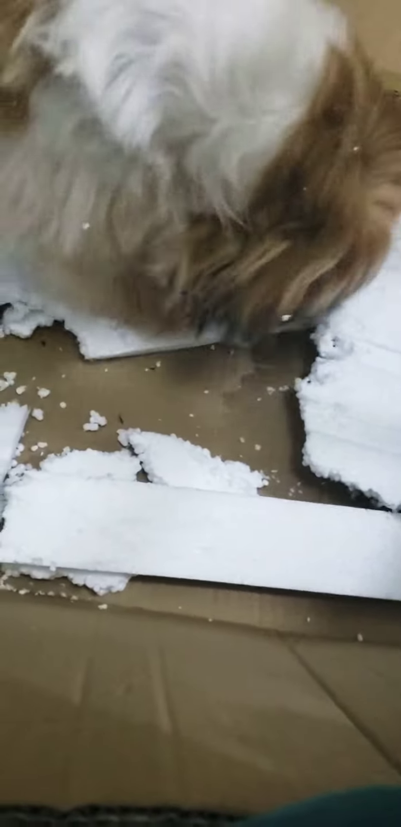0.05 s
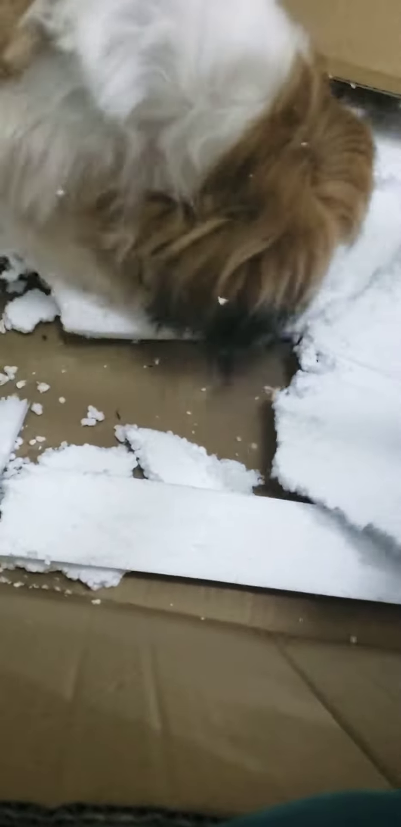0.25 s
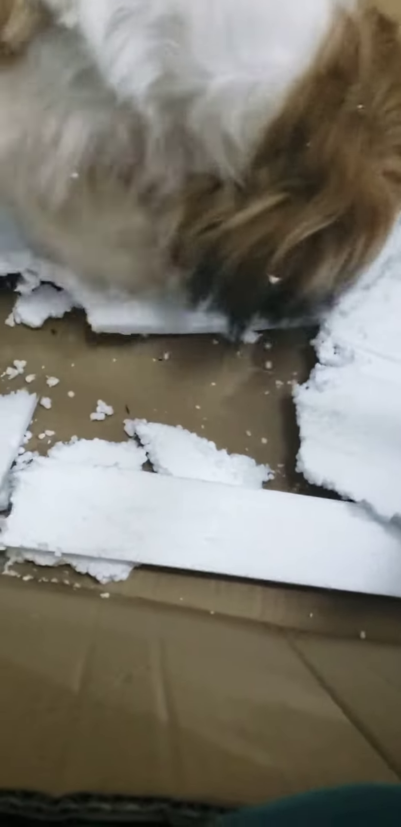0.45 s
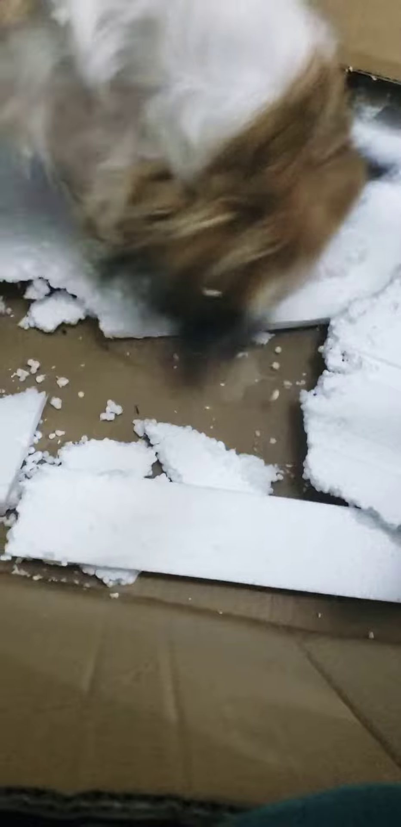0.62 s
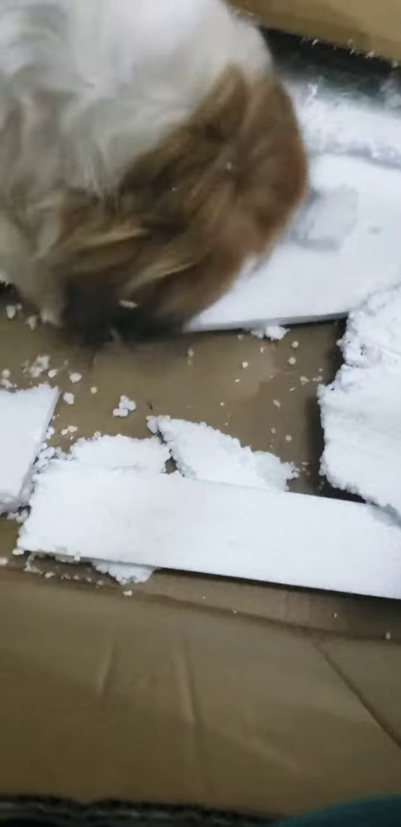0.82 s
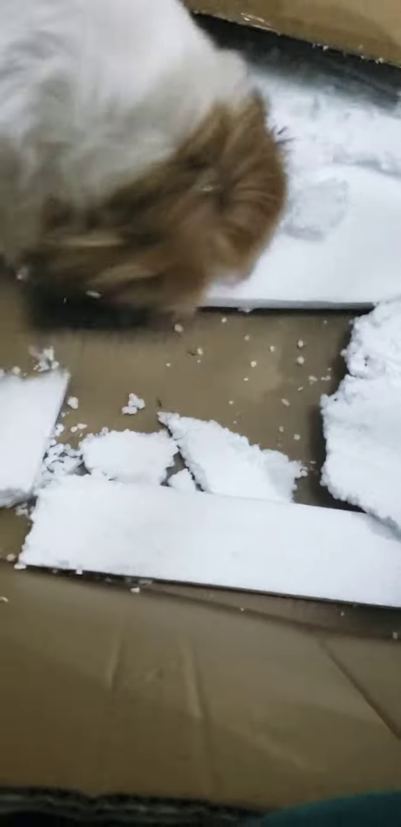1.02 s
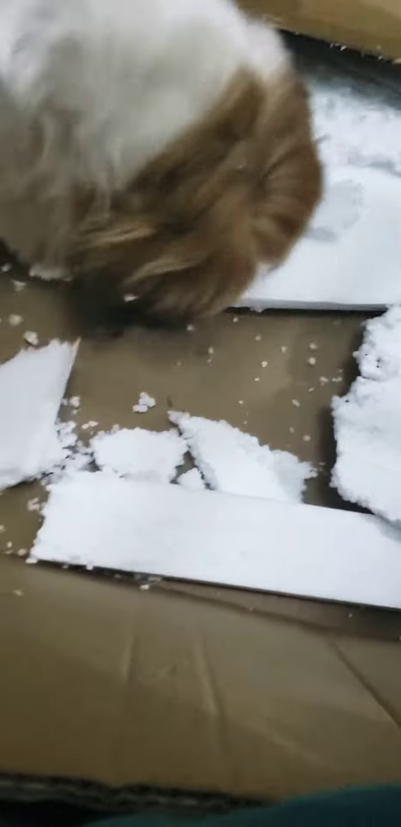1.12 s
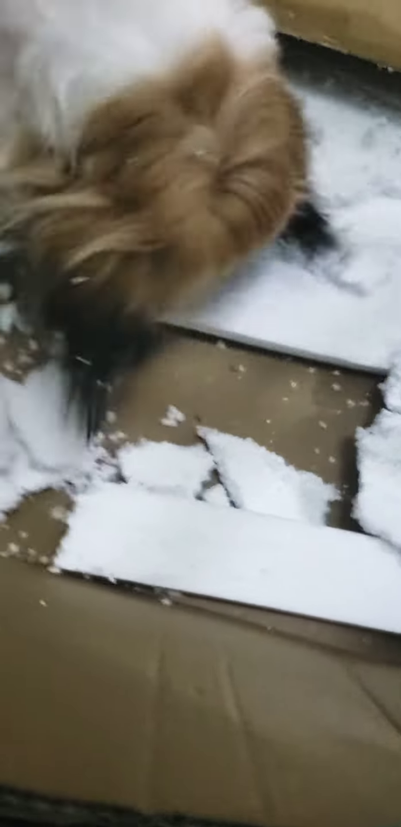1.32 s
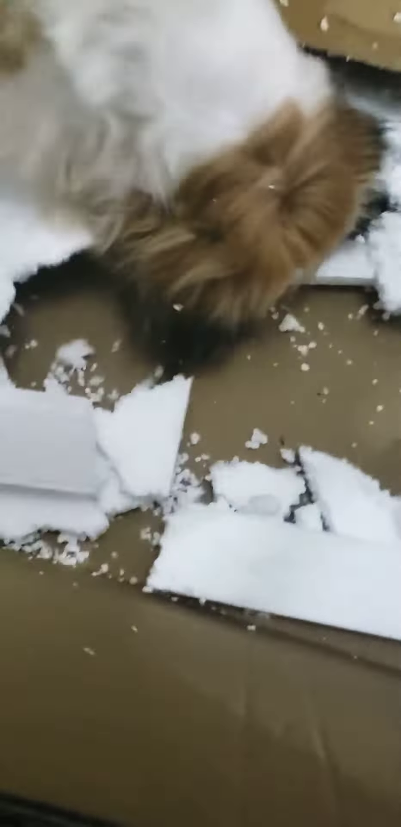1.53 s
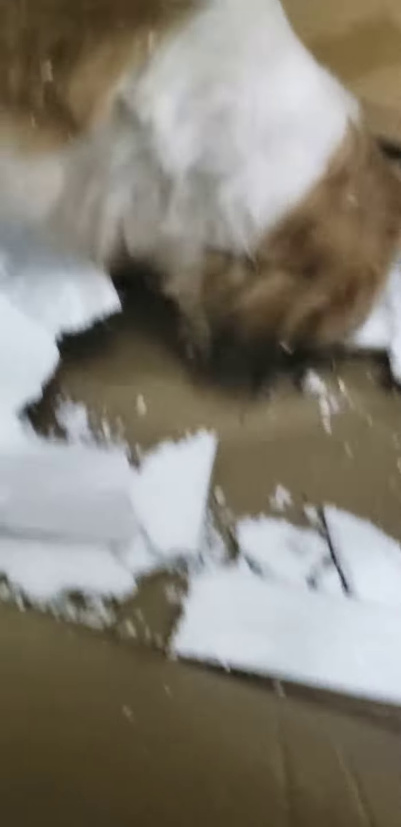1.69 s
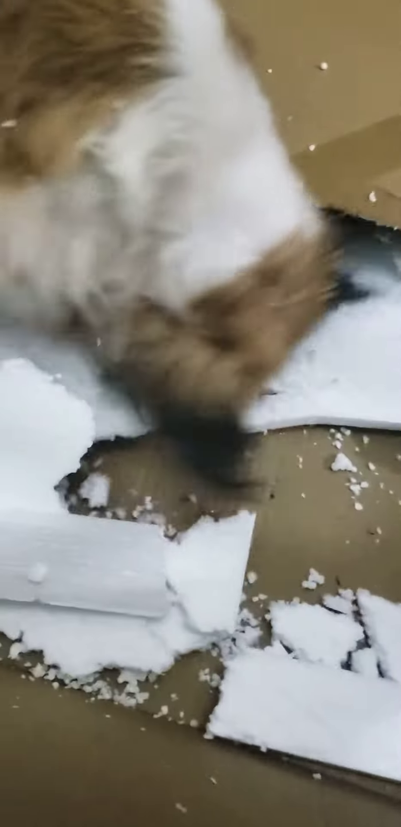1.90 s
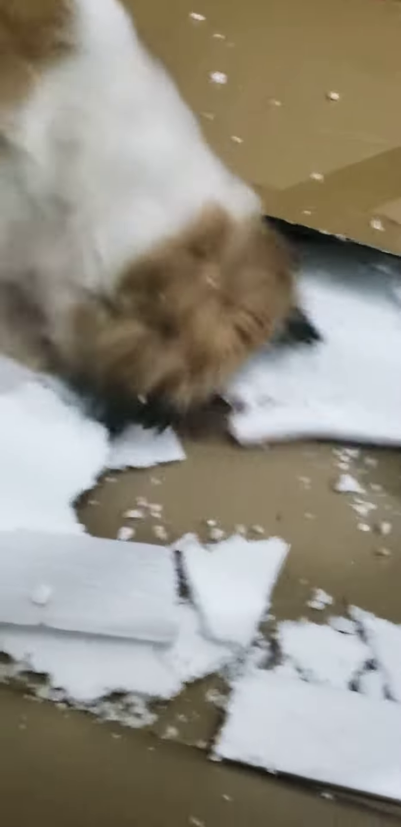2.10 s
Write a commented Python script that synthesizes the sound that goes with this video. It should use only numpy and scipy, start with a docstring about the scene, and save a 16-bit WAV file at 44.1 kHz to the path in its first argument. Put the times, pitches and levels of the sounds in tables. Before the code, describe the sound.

Brittle foam crackles and snaps close to the microphone as a puppy bites it in a cardboard box. A crunchy burst comes at about 0.2 to 0.4 seconds and another near 0.6. After a short lull, scraping and tearing resume from 0.9 to 1.9 seconds in rough, uneven bursts, strongest around 1.2 and 1.5, with dull bumps from the box. Soft room noise and a faint hum lie underneath.

```python
"""Foam rubs softly on cardboard over room air and a faint hum: a puppy is at a sheet of brittle packing
foam in a box, close to a phone in a small room. As it bites, single beads snap and the foam pings.
Each tear is a run of tiny fractures that crackle and shake the sheet. Now and then the box floor
flexes under the puppy with a dull bump."""
import sys
import numpy as np
from scipy import signal
from scipy.fft import rfft, irfft
from scipy.io import wavfile

SR = 44100
rng = np.random.default_rng(int(sys.argv[2]) if len(sys.argv) > 2 else 0)


def to_wav(s):
    """Save 16-bit WAV."""
    ch = np.atleast_2d(s).T  # columns
    pcm = np.round(np.clip(ch, -1, 1) * 32767)  # PCM
    wavfile.write(sys.argv[1], SR, pcm.astype(np.int16))


N = 94815
TIME_S = np.arange(N) / SR


def amp(db):
    """Decibels to gain."""
    return 10 ** (np.asarray(db) / 20)


def unit(x):
    """Scale to rms 1."""
    return x / np.sqrt(np.mean(x ** 2))


def convolve(x, response):
    """Pass a sound through an impulse response."""
    return irfft(rfft(x, 2 * N) * rfft(response, 2 * N))[..., :N]


def colour(x, points, size=4096):
    """Minimum-phase filter of unit energy through (frequency [Hz], gain [dB]) points."""
    hz, db = np.array(points).T
    bins_hz = np.maximum(np.fft.rfftfreq(size, 1 / SR), 1)
    gain = amp(np.interp(np.log(bins_hz), np.log(hz), db))
    cepstrum = irfft(np.log(gain))
    cepstrum[1:size // 2] *= 2
    cepstrum[size // 2 + 1:] = 0
    response = irfft(np.exp(rfft(cepstrum)))
    return convolve(x, response / np.linalg.norm(response))


def pan(db):
    """Stereo gains, left louder by db."""
    return unit(amp(np.array([[db], [-db]]) / 2))


def port_noise(own_gain):
    """Noise at the phone's two ports: one shared part plus each port's own."""
    return rng.standard_normal(N) + own_gain * rng.standard_normal((2, N))


def slips(rate_per_s, spread_db, count=8000):
    """Irregular impulses of uneven size, rms 1."""
    at = (np.cumsum(rng.exponential(1, count)) * SR / rate_per_s).astype(int)
    size = amp(spread_db * np.clip(rng.standard_normal(count), -2, 2)) * rng.choice([-1, 1], count)
    return unit(np.bincount(at[at < N], size[at < N], N))


def burst(impulses, decay_s, scattered, scatter_s=0.0085):
    """Each impulse sets off a puff of breaking cells; the box scatters a share of its energy."""
    short, long = (np.exp(-2 * TIME_S / s) for s in (decay_s, scatter_s))
    energy_decay = (1 - scattered) * short / short.sum() + scattered * long / long.sum()
    envelope = np.sqrt(np.abs(convolve(impulses ** 2, energy_decay)))
    return envelope * unit(port_noise(amp(1.5)))


def place(x, pan_db, room_db, room_channels=2, t60_s=0.33, port_lag_s=0.00015):
    """Sound reaches the left port first, then returns as dense room reflections."""
    left, right = x * np.ones((2, 1))
    direct = np.array([left, np.roll(right, int(port_lag_s * SR))])
    build_up = 1 - np.exp(-TIME_S / (t60_s / 50))
    tail = rng.standard_normal((room_channels, N)) * amp(-60 * TIME_S / t60_s) * build_up
    tail /= np.linalg.norm(tail, axis=1, keepdims=True)
    return direct * pan(pan_db) + amp(room_db) * convolve(x, tail) * pan(pan_db / 2)


# Rub envelope (time [s], level [dB])
RUB_LEVELS = [(0, -44), (.11, -44), (.16, -41.5), (0.229, -32.5), (.37, -43), (.46, -53), (.83, -50),
              (0.892, -30), (1.02, -37), (1.085, -36), (1.125, -43.5), (1.208, -21.5), (1.3, -49),
              (1.371, -33.5), (1.45, -21.5), (1.505, -36.5), (1.6, -28.5), (1.7, -42), (1.81, -27.5),
              (1.91, -39), (2.15, -39.5)]


def rubbing(rasp_db=-9, knock_db=-12):
    """Foam sticks and slips on cardboard; returns crackle, rasp and knock drives."""
    at_s, db = np.array(RUB_LEVELS).T
    grains = amp(np.interp(TIME_S, at_s, db)) * slips(rate_per_s=1800, spread_db=-2.5)
    puffs = burst(grains, decay_s=0.00073, scattered=0.45)
    return puffs, amp(rasp_db) * grains, amp(knock_db) * grains


# Crackle spectrum (frequency [Hz], gain [dB])
CRACKLE_SPECTRUM = [(500, -24), (1500, -3), (2600, -3.5), (3700, 1.5), (6000, 0), (7700, 1.5), (8900, -2.5),
                    (12000, 4), (15500, 1)]


def crackling(puffs):
    """Breaking cells: the foam's bright top."""
    return colour(puffs, CRACKLE_SPECTRUM)


# Rasp spectrum (frequency [Hz], gain [dB])
RASP_SPECTRUM = [(250, -23), (600, -3.5), (1000, -0.5), (1500, -5), (2200, -8), (3500, -11), (8000, -29)]


def rasping(pushes):
    """The shaken sheet rasps in the midrange."""
    return colour(burst(pushes, decay_s=0.002, scattered=0.25), RASP_SPECTRUM)


# Knock spectrum (frequency [Hz], gain [dB])
KNOCK_SPECTRUM = [(40, -41.5), (100, -14.5), (200, -1), (320, 1.5), (450, 2.5), (620, -15.5), (1200, -18.5),
                  (4000, -81)]
# Modes of the sheet on the box (frequency [Hz], relative level [dB], T60 [s])
SHEET_MODES = [(128, -16, 0.21), (153.4, -15.5, 0.17), (217, -16.5, 0.13), (308.2, -7, 0.28),
               (390.4, -6, 0.13), (434, -9, 0.11), (490, -8, 0.079)]


def knocking(pushes):
    """The pushed sheet gives a dull knock and rings hollow at its modes."""
    ring = sum(amp(db) * unit(np.cos(2 * np.pi * hz * TIME_S) * amp(-60 * TIME_S / t60_s))
               for hz, db, t60_s in SHEET_MODES)
    return (colour(pushes, KNOCK_SPECTRUM) + convolve(pushes, ring / np.sqrt(N))) / 2


# Hum partials (frequency [Hz], nominal starting level [dB])
HUM_PARTIALS = [(153.5, -54), (227, -58), (308, -57), (386, -61.5)]


def humming(waver_db=6, waver_rad=0.5, fade_db_per_s=5.5, knots=24):
    """A faint hum, perhaps an appliance, wavers and fades."""
    def waver():
        return np.interp(TIME_S, np.linspace(0, TIME_S[-1], knots), rng.standard_normal(knots))

    hum = np.zeros(N)
    for hz, db in HUM_PARTIALS:
        rms = amp(db + waver_db * waver() - fade_db_per_s * TIME_S)
        hum += np.sqrt(2) * rms * np.sin(2 * np.pi * hz * TIME_S + waver_rad * waver())
    return hum


# Air spectrum (frequency [Hz], gain [dB])
AIR_SPECTRUM = [(25, -18), (70, -3), (150, -3), (400, 2.5), (800, -9.5), (2000, -11.5), (6000, -19.5),
                (16000, -32)]


def room_air(level_db=-51.5):
    """Soft, steady room noise."""
    return amp(level_db) * unit(colour(port_noise(0.53), AIR_SPECTRUM))


# Bead snaps (time [s], crackle drive [dB], rasp drive [dB], knock drive [dB])
BEAD_SNAPS = [(.0437, -24, -62, -40), (0.129, -32, -44, -39), (0.2445, -13, -22, -34),
              (0.2576, -15.5, -19, -25), (0.2679, -12, -21, -33), (0.2746, -14, -14, -19.5),
              (.3100, -9, -36, -13.5), (0.3326, -15.5, -18, -21), (.3360, -30, -36, -13.5),
              (0.3496, -14, -39, -24), (0.361, -19, -17, -18.5), (0.5426, -26, -31.5, -25),
              (0.5494, -24, -17.5, -21.5), (0.566, -28, -25.5, -34), (.5765, -20, -17.5, -29),
              (0.5993, -13.5, -22.5, -43), (.6012, -25, -23, -13.5), (0.843, -39, -40, -34.5),
              (0.8764, -25.5, -27, -42), (.909, -39, -23.5, -26.5), (0.994, -31, -25.5, -45),
              (1.0131, -24, -51, -33), (1.1955, -30, -14.5, -17.5), (1.2172, -29, -22, -9.5),
              (1.2271, -29, -26, -20.5), (1.264, -44, -41, -28), (1.3310, -26.5, -37, -46),
              (1.4515, -13.5, -29, -38), (1.4668, -23, -33, -14), (1.5303, -13, -32, -48),
              (1.5715, -34, -18.5, -29), (1.5958, -21, -45, -28), (1.6146, -20, -22.5, -35),
              (1.7117, -32, -32.5, -38), (1.7378, -19.5, -38, -43), (1.778, -42, -27.5, -27),
              (1.801, -34, -43, -20)]


def snapping(reference_s=0.0017):
    """Single beads crack and jolt the sheet; returns crackle, rasp and knock drives."""
    kicks = np.zeros((3, N))
    for at_s, *levels_db in BEAD_SNAPS:
        # One sample holds the energy of reference_s at that level.
        kicks[:, int(at_s * SR)] += amp(levels_db) * np.sqrt(reference_s * SR)
    crackle, rasp, knock = kicks
    return burst(crackle, decay_s=0.0012, scattered=0.17), rasp, knock


# Pings and squeaks (time [s], frequency [Hz], level [dB], decay [s])
FOAM_PINGS = [(.0438, 7400, -18.5, 0.00072), (.9085, 1090, -30, .005), (.9915, 1060, -26.5, 0.003),
              (1.5301, 4120, -16, 0.00082), (1.5815, 1040, -22, 0.003), (1.6142, 973, -20, 0.0057)]


def pinging():
    """The foam slips free and rings for a few cycles; the cardboard squeaks briefly near 1 kHz."""
    pings = np.zeros(N)
    for at_s, hz, db, decay_s in FOAM_PINGS:
        age_s = np.maximum(TIME_S - at_s, 0)
        pings += amp(db) * np.sin(2 * np.pi * hz * age_s) * np.exp(-age_s / decay_s)
    return pings


# Tears (start [s], end [s], crackle drive [dB], rasp drive [dB], knock drive [dB], growth [dB])
FOAM_TEARS = [(0.258, 0.37, -23, -28, -26, -8), (0.545, .603, -25.5, -32, -25.5, 8),
              (0.884, 0.921, -39, -41.5, -44, 14.5), (0.972, 1.023, -34.5, -46, -48.5, 6),
              (1.182, 1.182, -28, -32, -36, 7), (1.2, 1.222, -26.5, -34, -26, 9),
              (1.412, 1.467, -27.5, -36.5, -35.5, 6), (1.54, 1.63, -28.5, -31.5, -39, -0.5),
              (1.741, 1.81, -34.5, -39, -35, -3), (1.852, 1.854, -24.5, -35.5, -30, 5.5)]


def tearing(attack_s=0.0016, release_s=0.014, knock_release_s=0.016):
    """Each pull sets off a run of fractures; returns crackle, rasp and knock drives."""
    crackle, rasp, knock = np.zeros((3, N))
    for start_s, end_s, crackle_db, rasp_db, knock_db, growth_db in FOAM_TEARS:
        age_s = TIME_S - start_s
        progress = np.clip(age_s / max(end_s - start_s, 1 / SR), 0, 1)
        pull = np.clip(age_s / attack_s, 0, 1) * amp(growth_db * (progress - 0.5))
        after_s = np.maximum(TIME_S - end_s, 0)
        crackle += amp(crackle_db) * pull * np.exp(-after_s / release_s)
        rasp += amp(rasp_db) * pull * np.exp(-after_s / release_s)
        knock += amp(knock_db) * pull * np.exp(-after_s / knock_release_s)
    fractures = slips(rate_per_s=650, spread_db=4)
    puffs = burst(crackle * fractures, decay_s=0.00083, scattered=0.46)
    return puffs, rasp * fractures, knock * fractures


# Box bumps (peak time [s], level [dB], half length [s])
BOX_BUMPS = [(0.315, -43, 0.017), (.632, -51, .02), (0.873, -58, 0.018), (0.935, -44.5, 0.0092),
             (1.03, -55.5, 0.09), (1.205, -47, 0.057), (1.36, -48, 0.065), (1.465, -36, 0.012),
             (1.509, -30, 0.014), (1.59, -47, .04), (1.8, -57, 0.13)]
# Bump spectrum (frequency [Hz], gain [dB])
BUMP_SPECTRUM = [(20, -24), (48, -8.5), (70, -1.5), (110, -4.5), (200, -14), (600, -39)]


def bumping():
    """The box floor flexes under the puppy's weight."""
    power = sum(amp(2 * db) * np.exp(-((TIME_S - at_s) / half_s) ** 2) for at_s, db, half_s in BOX_BUMPS)
    flex = unit(colour(port_noise(0.54), BUMP_SPECTRUM))
    return np.sqrt(power) * flex * pan(db=-0.5)


def scene():
    """Tears, snaps and rubbing drive one sheet in one room; pings, bumps, hum and air are added."""
    crackle, rasp, knock = (sum(drives) for drives in zip(tearing(), snapping(), rubbing()))
    return (place(crackling(crackle), pan_db=10, room_db=-12)
            + place(rasping(rasp), pan_db=5.5, room_db=-9)
            + place(knocking(knock), pan_db=1, room_db=-15.5, room_channels=1)
            + place(pinging(), pan_db=14, room_db=-12)
            + bumping() + humming() + room_air())


def record(dry):
    """The phone rounds the highest peaks and cuts the top."""
    cutoff_hz = 15850
    lowpass = signal.ellip(10, 0.2, 80, cutoff_hz, fs=SR, output="sos")
    return signal.sosfilt(lowpass, np.tanh(dry))


dry = scene()
out = record(dry)
to_wav(out)
```